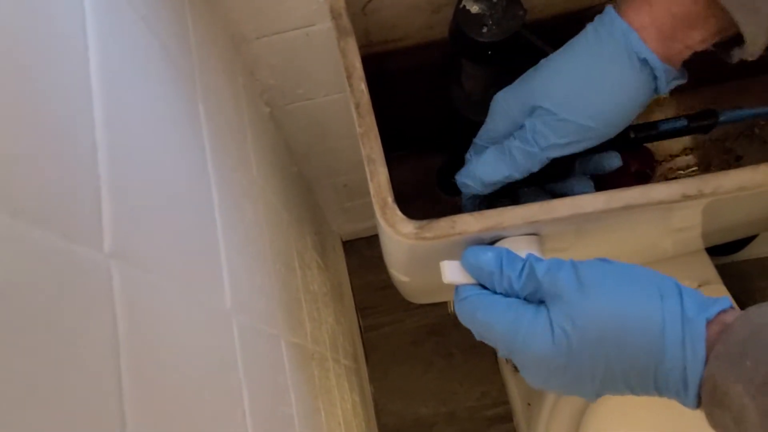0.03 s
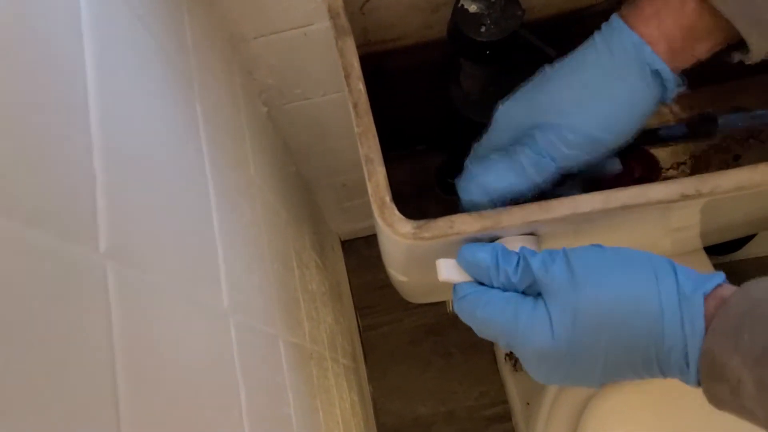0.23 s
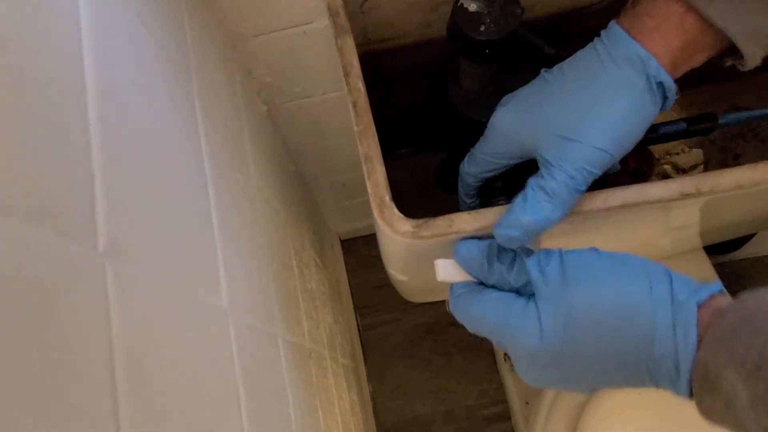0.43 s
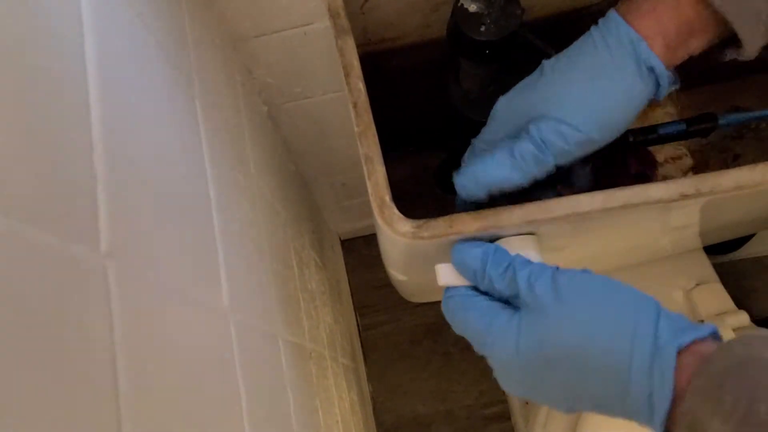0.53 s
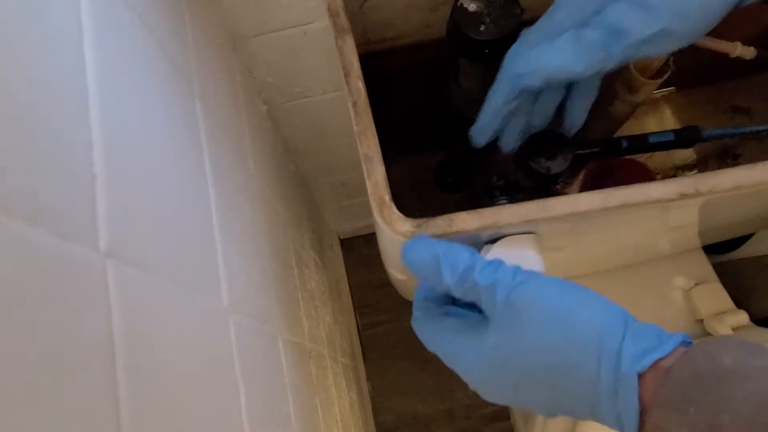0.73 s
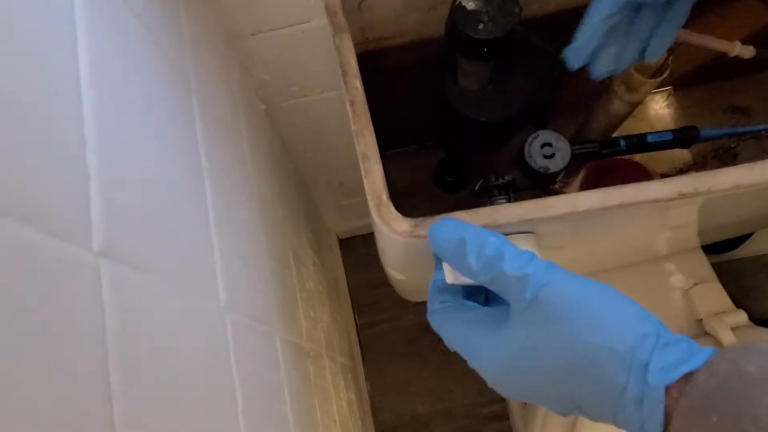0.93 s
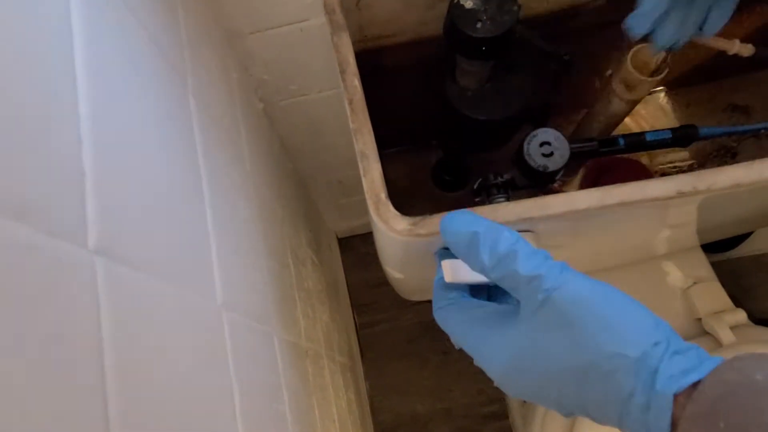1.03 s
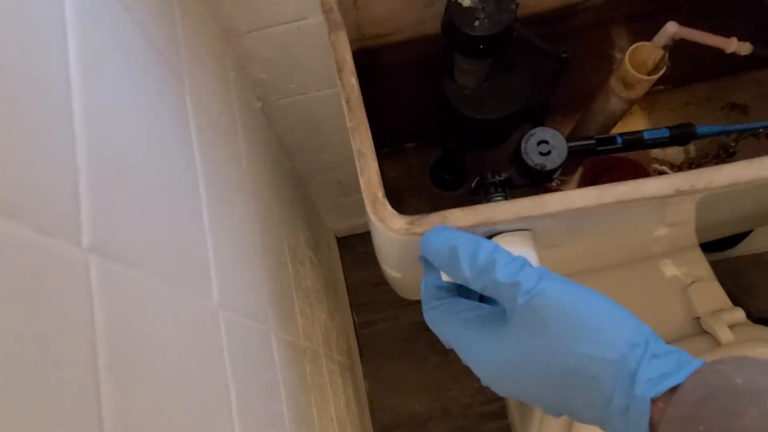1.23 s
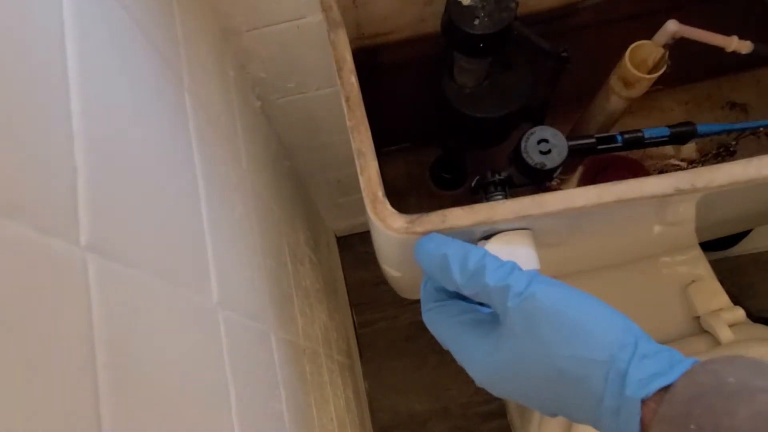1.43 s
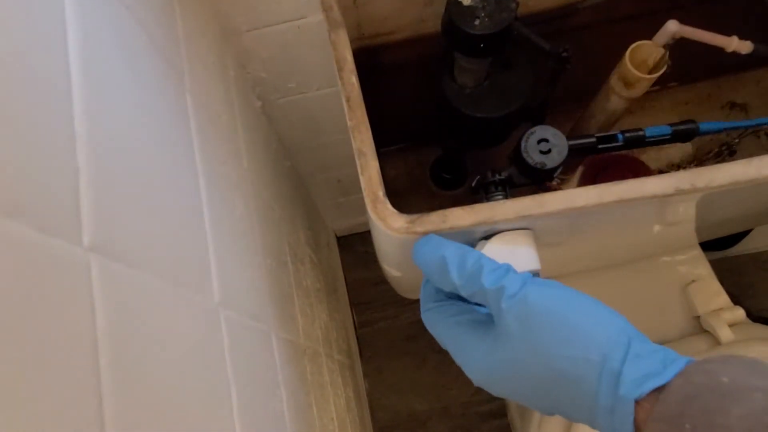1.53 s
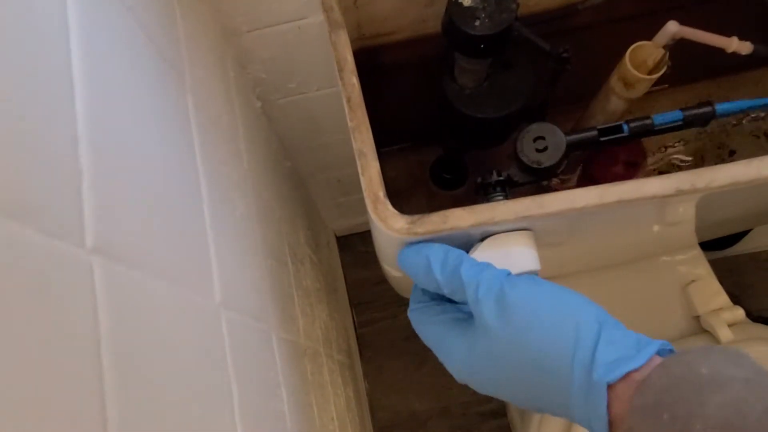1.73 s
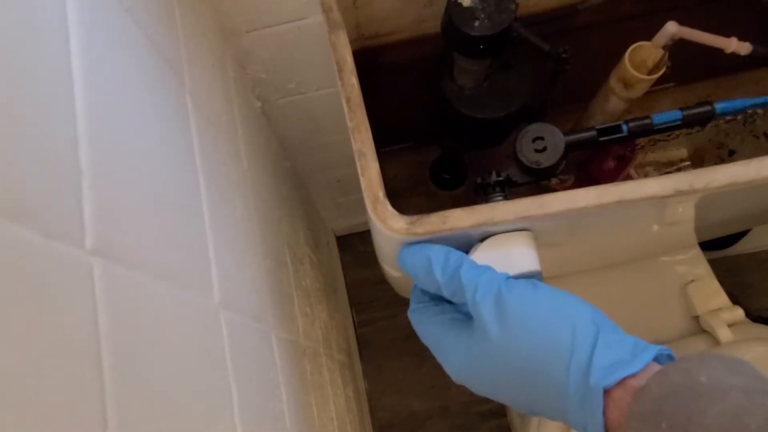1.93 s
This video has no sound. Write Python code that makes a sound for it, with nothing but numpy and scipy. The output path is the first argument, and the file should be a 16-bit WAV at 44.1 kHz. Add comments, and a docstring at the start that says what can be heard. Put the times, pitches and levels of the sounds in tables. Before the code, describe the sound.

Close up in a small bathroom, a toilet's flush handle knocks sharply on the hollow porcelain tank. Hands thud against it, and the plastic linkage quietly squeaks, clicks and taps while rubber gloves rustle over a low handling rumble.

```python
"""A toilet's flush handle clacks against the open tank, which booms, in a small tiled bathroom.
Gloved hands bump the tank and damp its ring. The plastic linkage then sticks and slips in short
squeaks, clicks, and taps against the ringing porcelain. Rubber gloves rustle over a low
handling rumble and the quiet air of the room."""
import sys
import numpy as np
from scipy import signal
from scipy.fft import rfft, irfft, next_fast_len
from scipy.io import wavfile
from scipy.ndimage import uniform_filter1d, map_coordinates

SR = 44100
rng = np.random.default_rng(int(sys.argv[2]) if len(sys.argv) > 2 else 0)


def master(y):
    """Save y as 16-bit WAV."""
    cut = np.clip(np.atleast_2d(y).T, -1, 1)
    pcm = np.round(cut * 32767)  # scale
    wavfile.write(sys.argv[1], SR, pcm.astype(np.int16))


N = 88200


def amp(db):
    return 10 ** (np.asarray(db) / 20)


def unit_rms(x):
    return x / np.sqrt(np.mean(x ** 2) + 1e-20)


def along(points, hz):
    """Interpolate (freq_hz, value) points on a log axis."""
    freqs, values = np.transpose(points)
    return np.interp(np.log(hz + 1), np.log(freqs + 1), values)


def since(start_s):
    """Seconds since start_s, zero before."""
    return np.maximum(np.arange(N) / SR - start_s, 0)


def level(points):
    """Gain per sample from (time_s, level_db) points."""
    return amp(np.interp(since(0), *np.transpose(points)))


def filtered(x, response):
    """Apply a gain given as a function of frequency."""
    size = next_fast_len(N + SR // 4)
    return irfft(rfft(x, size) * response(np.fft.rfftfreq(size, 1 / SR)), size)[..., :N]


# Left-right likeness of the sound field: freq_hz, correlation
COHERENCE = [(60, .99), (260, .96), (500, .65), (1000, .2), (2500, 0), (16000, 0)]


def stereo_angle(hz):
    """Mid-side angle in radians: narrow bass, diffuse treble."""
    return np.arccos(np.clip(along(COHERENCE, hz), -1, 1)) / 2


def noise(spectrum):
    """Coloured stereo noise, rms 1."""
    def response(hz):
        angle = stereo_angle(hz)
        return amp(along(spectrum, hz)) * [np.cos(angle), np.sin(angle)]
    mid, side = filtered(rng.standard_normal((2, N)), response)
    return unit_rms(np.array([mid + side, mid - side]))


def patchy(x, depth_db, frames):
    """Random gain patches a few hundred Hz wide; output rms 1."""
    bins = signal.stft(x, nperseg=512)[2]
    field = uniform_filter1d(rng.standard_normal(bins.shape[1:]), size=3, axis=0)
    field = unit_rms(uniform_filter1d(field, size=frames, axis=1))
    return unit_rms(signal.istft(bins * amp(depth_db * field), nperseg=512)[1][:, :N])


def decay(t, t60_s):
    return np.exp(-np.log(1000) * t / t60_s)


def strike(start_s, rise_s, t60_s):
    """Envelope of a blow."""
    t = since(start_s)
    return (1 - np.exp(-t / rise_s)) * decay(t, t60_s)


def ring(start_s, modes, rise_s):
    """Damped modes; the higher ones are out of phase between channels."""
    out = np.zeros((2, N))
    for hz, db, t60_s in modes:
        skew = stereo_angle(hz) * rng.choice([-1, 1]) * np.array([[1], [-1]])
        out += amp(db) * strike(start_s, rise_s, t60_s) * np.sin(2 * np.pi * hz * since(start_s) + skew)
    return out


def blip(start_s, hz, length_s, jitter_rad=0):
    """Short tone under a half sine, with optional phase jitter."""
    t = since(start_s)
    wander = map_coordinates(rng.standard_normal(N // 8), [np.minimum(t, length_s) * hz / 4], order=1)
    swell = np.sin(np.pi * np.minimum(t / length_s, 1))
    return swell * np.sin(2 * np.pi * hz * t + jitter_rad * wander)


def pan(left_over_right_db):
    return amp(left_over_right_db * np.array([[.5], [-.5]]))


# Reverberation of the bathroom: freq_hz, t60_s
ROOM_DECAY = [(200, 0.1), (1000, 0.19), (4000, 0.14), (8000, 0.13), (15000, 0.086)]


def room(x, wet_db):
    """Add the short reverberation of the tiled walls."""
    white = noise([(1, 0), (SR, 0)])[:, :SR // 2]
    hz, t, bins = signal.stft(white, SR, nperseg=256)
    tail = signal.istft(bins * decay(t, along(ROOM_DECAY, hz)[:, None]), SR, nperseg=256)[1]
    tail *= 1 - np.exp(-np.arange(tail.shape[1]) / SR / .004)  # 4 ms build-up
    tail /= np.linalg.norm(tail[0])
    return x + amp(wet_db) * signal.fftconvolve(np.atleast_2d(x), tail, axes=1)[:, :N]


# Room air: freq_hz, gain_db
AIR_SPECTRUM = [(59, -33.5), (100, -2), (166, -13), (289, -13.5), (524, -6.5), (595, -29), (662, -12.5),
                (1170, -14), (1280, -11), (1680, -17), (4570, -21), (16000, -42.5)]
# Handling rumble: time_s, level_db
RUMBLE_LEVEL = [(0, -64.5), (.15, -61.5), (.22, -52.5), (.5, -42.5), (.62, -51.5), (.7, -50.5), (.78, -50),
                (.84, -53), (.95, -51), (1.1, -64), (1.58, -67.5), (1.7, -53), (1.85, -56.5), (2, -65.5)]
# Handling rumble: freq_hz, gain_db
RUMBLE_SPECTRUM = [(25, 2.5), (70, -2), (105, -10), (140, -9.5), (200, -11.5), (300, -16.5), (600, -34.5),
                   (1500, -61.5)]


def background(air_db=-70.5):
    """Handling rumble over the still air of the room."""
    return level(RUMBLE_LEVEL) * noise(RUMBLE_SPECTRUM) + amp(air_db) * noise(AIR_SPECTRUM)


# Glove sliding on the tank: time_s, level_db
SLIDE_LEVEL = [(0, -66), (.04, -81.5), (.08, -69), (.16, -66.5), (.2, -67.5), (.5, -71), (.545, -57.5),
               (.61, -69.5), (.68, -71), (.76, -54), (.81, -67.5), (.9, -61.5), (.95, -63.5), (.99, -70.5),
               (1.15, -74.5), (1.3, -87.5)]
# Slide friction: freq_hz, gain_db
SLIDE_SPECTRUM = [(200, -8), (800, -3), (2000, 4), (5000, -2.5), (9000, -9), (16000, -12.5)]
# Glove rubbing on the handle: time_s, level_db
RUB_LEVEL = [(1.58, -93.5), (1.64, -71), (1.68, -54.5), (1.716, -48.5), (1.765, -61.5), (1.79, -53),
             (1.825, -50), (1.85, -68.5), (1.875, -54), (1.897, -88.5), (1.95, -67), (2, -77)]
# Rub friction: freq_hz, gain_db
RUB_SPECTRUM = [(1060, -39), (1800, -6.5), (2100, -2), (3350, -3.5), (3570, -9), (4790, -1.5), (6410, -2),
                (7700, -7.5), (9250, -3.5), (15000, -9), (16000, -23.5)]
# Glove and plastic clicks: start_s, level_db
CLICK_HITS = [(0.396, -44.5), (0.404, -46), (.586, -52), (0.701, -50.5), (0.735, -36.5), (0.7741, -37),
              (.781, -46), (0.892, -42.5), (0.935, -52), (1.713, -46), (1.781, -47), (1.877, -54.5)]
# Click noise: freq_hz, gain_db
CLICK_SPECTRUM = [(300, -8), (1300, 14), (2200, -1), (5000, -1), (9000, -6.5), (16000, -16.5)]
# Resonances of the plastic parts: centre_hz, half_width_hz, boost_db
PLASTIC_PEAKS = [(1900, 50, 7.5), (3240, 57, 4), (4950, 660, 4), (6400, 88, 4), (8900, 250, 7),
                 (10400, 740, 2)]


def gloves(grain_hz=140, grain_db=2.5):
    """Grainy rubber friction and crisp clicks, coloured by the plastic parts."""
    def rustle(spectrum):
        return patchy(noise(spectrum), depth_db=4.5, frames=5)

    def plastic(hz):
        boost_db = sum(db / (1 + ((hz - centre) / width) ** 2) for centre, width, db in PLASTIC_PEAKS)
        return amp(boost_db - 1)

    roughness = map_coordinates(rng.standard_normal(N), [since(0) * grain_hz])
    grain = unit_rms(amp(grain_db * roughness))
    slide = level(SLIDE_LEVEL) * rustle(SLIDE_SPECTRUM)
    rub = level(RUB_LEVEL) * rustle(RUB_SPECTRUM)
    bursts = sum(amp(db) * strike(start_s, rise_s=.00097, t60_s=.037) for start_s, db in CLICK_HITS)
    clicks = bursts * rustle(CLICK_SPECTRUM)
    return room(filtered(grain * (slide + rub) + clicks, plastic), wet_db=-12)


# Plastic squeaks: start_s, pitch_hz, length_s, level_db, left_over_right_db
LINKAGE_SQUEAKS = [(.416, 2670, 0.0038, -48, -1.5), (.444, 2770, .004, -50, -3),
                   (0.521, 1800, 0.0028, -53, -3.5), (0.73, 2000, 0.0078, -40, 2.5),
                   (.735, 858, .008, -36, 7), (.746, 782, 0.027, -39, -5), (.843, 781, 0.024, -52, 9.5),
                   (0.873, 1700, .013, -46.5, 4.5), (0.893, 1380, 0.0084, -51, 8),
                   (.937, 1966, .008, -52.5, 9), (0.936, 3544, 0.017, -57.5, 1),
                   (1.6616, 1364, 0.0076, -40.5, 13), (1.672, 1300, 0.0058, -38, 4.5),
                   (1.7788, 1340, 0.0057, -45, 12)]


def squeaks():
    """The linkage sticks and slips in brief pitched chirps."""
    chirps = sum(amp(db) * pan(pan_db) * blip(start_s, hz, length_s, jitter_rad=.34)
                 for start_s, hz, length_s, db, pan_db in LINKAGE_SQUEAKS)
    return room(chirps, wet_db=-6.5)


# Linkage taps: start_s, level_db, snap_gain_db, lowpass_hz
TAP_HITS = [(1.2052, -36.5, 10, 4800), (1.9064, -47, -10, 1564)]
# Wash of tank and room: freq_hz, gain_db
TAP_SPECTRUM = [(59, -54), (100, -15), (228, -0.5), (388, -2.5), (673, -4), (794, -17.5), (903, -6.5),
                (989, -10), (1590, -9), (2260, -23), (2810, -16), (3440, -18.5), (8000, -31), (10400, -82),
                (17600, -120)]
# Tapped porcelain: pitch_hz, gain_db, t60_s
PORCELAIN_MODES = [(906, -8, .3), (1272, -20, .6), (2445, -7, .17), (2745, -8, .17), (1080, -16, .22),
                   (1432, -4, .1)]


def taps(crossover_hz=2180):
    """The linkage taps: a snap, ringing porcelain and a wash whose treble dies first."""
    out = np.zeros((2, N))
    for start_s, db, snap_db, lowpass_hz in TAP_HITS:
        wash = noise(TAP_SPECTRUM)
        lows = filtered(wash, lambda hz: 1 / (1 + (hz / crossover_hz) ** 4))
        body = strike(start_s, rise_s=.0018, t60_s=.22) * lows
        treble = amp(2.5) * strike(start_s, rise_s=.00054, t60_s=.14) * (wash - lows)
        snap = amp(snap_db) * blip(start_s, hz=1500, length_s=.0018)
        porcelain = ring(start_s, PORCELAIN_MODES, rise_s=.0024)
        lowpass = signal.butter(4, lowpass_hz, fs=SR)
        out += amp(db) * signal.lfilter(*lowpass, snap + body + treble + porcelain)
    return out


# Nudges on the tank: start_s, level_db, drive_hz, rise_s
TANK_NUDGES = [(.75, -48, 184, .01), (0.853, -43.5, 396, 0.018), (1.664, -36, 637, 0.0063)]
# Hollow of the tank: pitch_hz, gain_db, t60_s
HOLLOW_MODES = [(198.7, 5, 0.33), (427, 1, 0.28), (786, -16, 0.27), (1097, 1, 0.2)]


def hollow(rolloff_db_per_octave=10):
    """Nudges ring the hollow tank, driving modes near drive_hz hardest."""
    out = np.zeros((2, N))
    for start_s, db, drive_hz, rise_s in TANK_NUDGES:
        modes = [(hz, gain_db - rolloff_db_per_octave * abs(np.log2(hz / drive_hz)), t60_s)
                 for hz, gain_db, t60_s in HOLLOW_MODES]
        out += amp(db) * ring(start_s, modes, rise_s)
    return out


# Jolts of bowl and floor: start_s, level_db
SHUDDER_HITS = [(0.267, -23.5), (.43, -26), (0.719, -57.5), (1.669, -54), (1.921, -54)]


def shudder(pitch_hz=59.3, t60_s=.46):
    """Bowl and floor shake in one low mode."""
    return sum(ring(start_s, [(pitch_hz, db, t60_s)], rise_s=.0042) for start_s, db in SHUDDER_HITS)


# Hand bumps: start_s, level_db, rise_s, t60_s
BUMP_HITS = [(0.232, -22.5, 0.0066, 0.53), (0.401, -19, 0.0038, 0.17), (0.424, -19.5, 0.0018, 0.217)]
# Bump noise: freq_hz, gain_db
BUMP_SPECTRUM = [(18, -25.5), (30, -4), (182, -3.5), (259, -2), (350, -15.5), (417, -15), (608, -27.5),
                 (761, -26), (1200, -34.5), (1540, -46.5), (2730, -51), (7270, -75.5), (12000, -65),
                 (15600, -100), (22000, -120)]
# Soft hand pushes: start_s, pitch_hz, length_s, level_db
HAND_PUSHES = [(.232, 132, 0.015, -26), (0.398, 148.4, 0.017, -27.5), (.402, 440, 0.011, -23.5),
               (0.42, 251.4, 0.031, -23.5), (.436, 61, 0.035, -21.5), (.735, 237, 0.024, -45),
               (.776, 193, 0.039, -45), (.89, 138.5, 0.14, -53.5), (1.912, 211, 0.035, -49.5)]


def bumps():
    """The hand meets the tank in dull thuds and short low tones."""
    thuds = sum(amp(db) * strike(start_s, rise_s, t60_s) * noise(BUMP_SPECTRUM)
                for start_s, db, rise_s, t60_s in BUMP_HITS)
    pushes = sum(amp(db) * blip(start_s, hz, length_s) for start_s, hz, length_s, db in HAND_PUSHES)
    return thuds + pushes


# Handle striking the tank: start_s, level_db
CLACK_HITS = [(0.2358, -21), (0.2387, -20.5), (0.2396, -9.5), (0.2468, -18)]
# Contact noise: freq_hz, gain_db
CLACK_SPECTRUM = [(59, -45), (100, -12.5), (266, -1), (676, -38), (1450, -7), (2270, -17.5), (2750, -15),
                  (3860, -20), (7610, -26), (8640, -22.5), (16000, -26.5)]
# Lever meeting its stop: start_s, pitch_hz, length_s, level_db
LEVER_STOPS = [(0.2406, 1415, .005, -15)]
# Tank and lever ringing: pitch_hz, gain_db, t60_s
TANK_MODES = [(258, 0, .37), (431, -18, .25), (653, -21, .19), (732, -23, .26), (289, -13, .22),
              (785, -14, .13), (930, -14, .07), (1180, -19, .22), (1340, -9, .11), (1421, -8, .09),
              (1580, -17, .07), (1906, -12, .09), (2078, -15, .08), (2490, -12, .13), (2660, -11, .1),
              (3205, -19, .11), (3638, -21, .11), (4926, -23, .1), (8537, -20, .07)]


def handle_knock(boom_start_s=.2405, boom_db=-8, damp_start_s=.44):
    """The handle rattles home and sets the tank ringing until the hand damps it."""
    contacts = sum(amp(db) * strike(start_s, rise_s=.0003, t60_s=.039) for start_s, db in CLACK_HITS)
    clack = contacts * patchy(noise(CLACK_SPECTRUM), depth_db=2, frames=12)
    stop = sum(amp(db) * blip(start_s, hz, length_s) for start_s, hz, length_s, db in LEVER_STOPS)
    boom = amp(boom_db) * ring(boom_start_s, TANK_MODES, rise_s=.0037)
    damping = decay(since(damp_start_s), t60_s=.27)
    return room(clack + stop, wet_db=-9.5) + boom * damping


def scene():
    """Stereo sum of all sources."""
    return handle_knock() + bumps() + shudder() + hollow() + taps() + squeaks() + gloves() + background()


# Channel imbalance: freq_hz, left_over_right_db
CHANNEL_BALANCE = [(100, 0.3), (400, 3.1), (1200, 2.5), (4000, -3), (12000, 0)]
TOP_HZ = 16000


def record(dry):
    """Channel imbalance, soft overload and band limit."""
    panned = filtered(dry, lambda hz: pan(along(CHANNEL_BALANCE, hz)))
    clipped = panned / (1 + panned ** 6) ** (1 / 6)
    return filtered(clipped, lambda hz: 1 / (1 + (hz / TOP_HZ) ** 100))


dry = scene()
out = record(dry)
master(out)
```